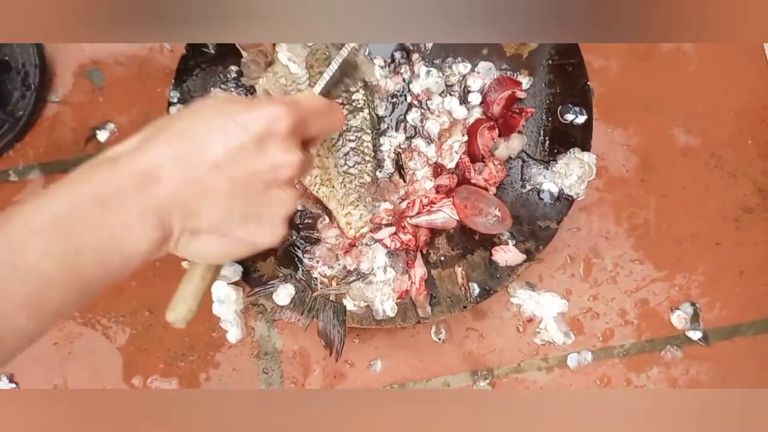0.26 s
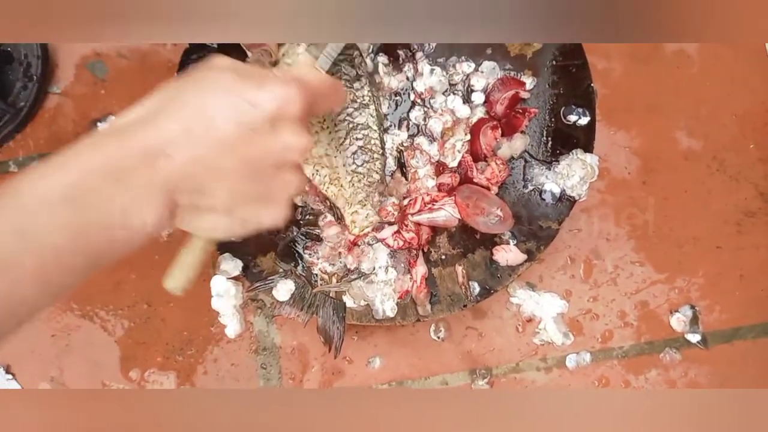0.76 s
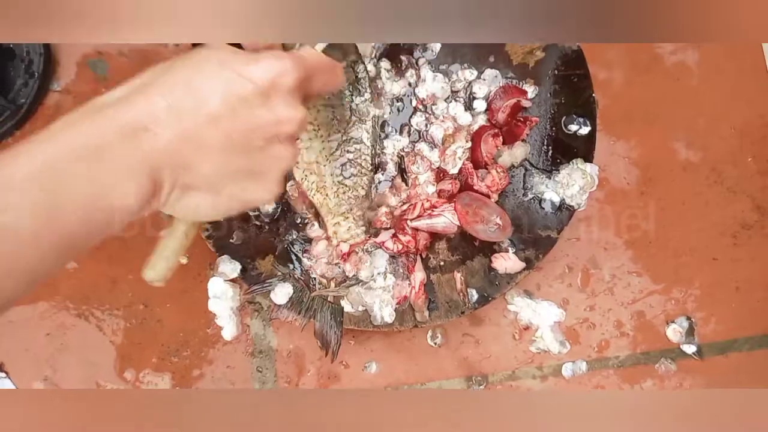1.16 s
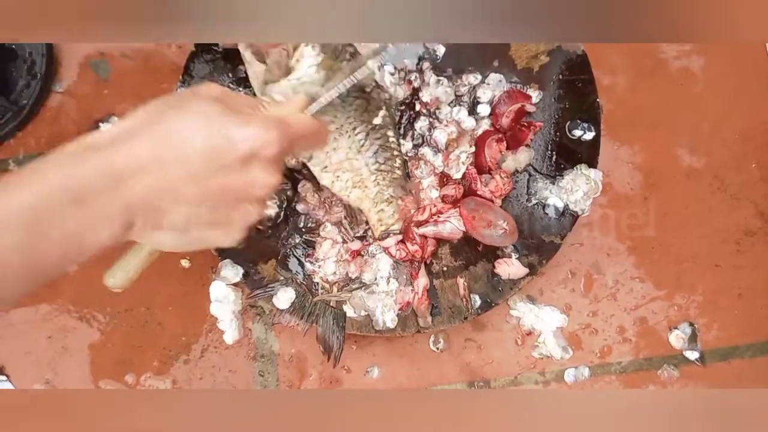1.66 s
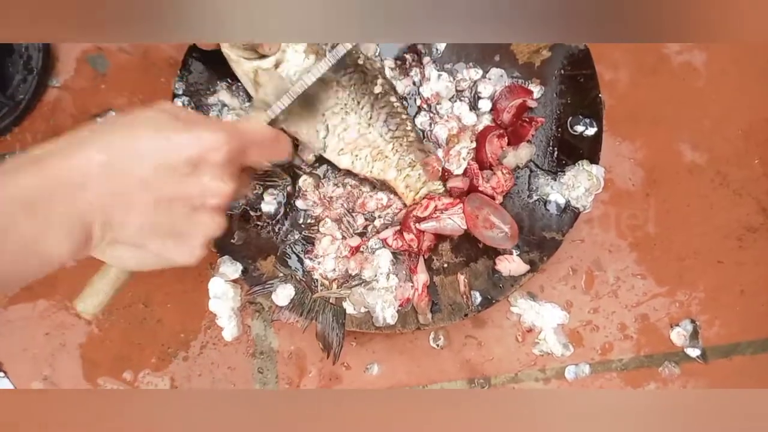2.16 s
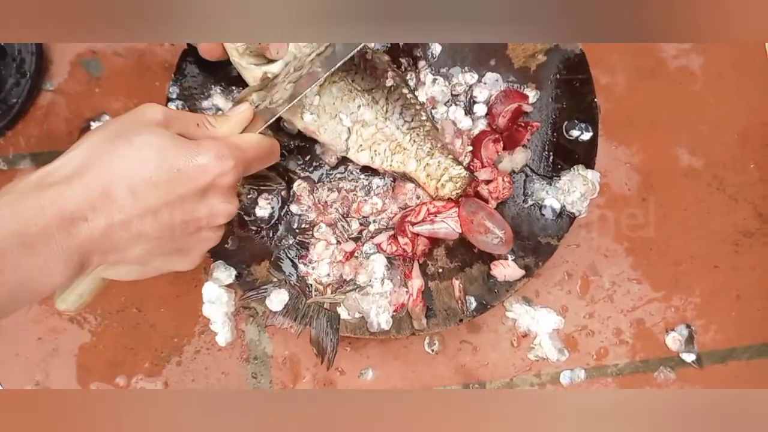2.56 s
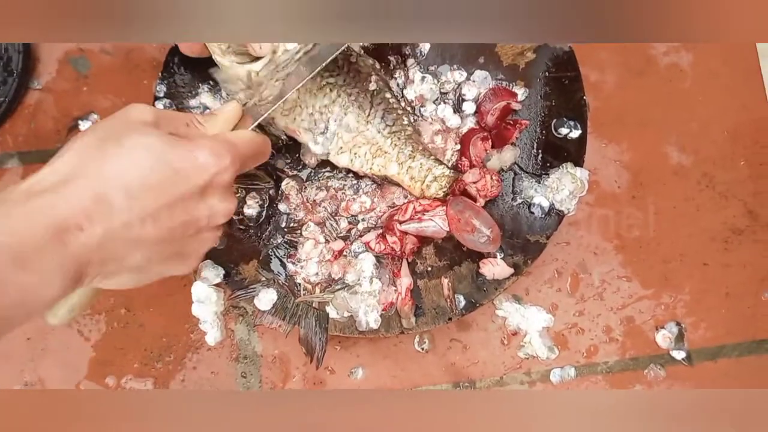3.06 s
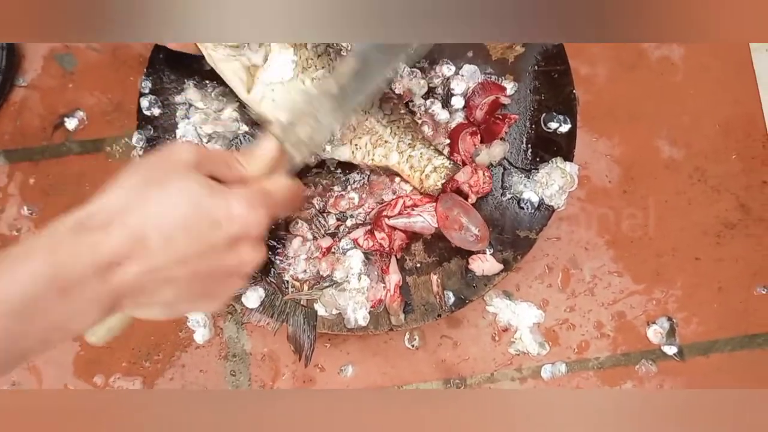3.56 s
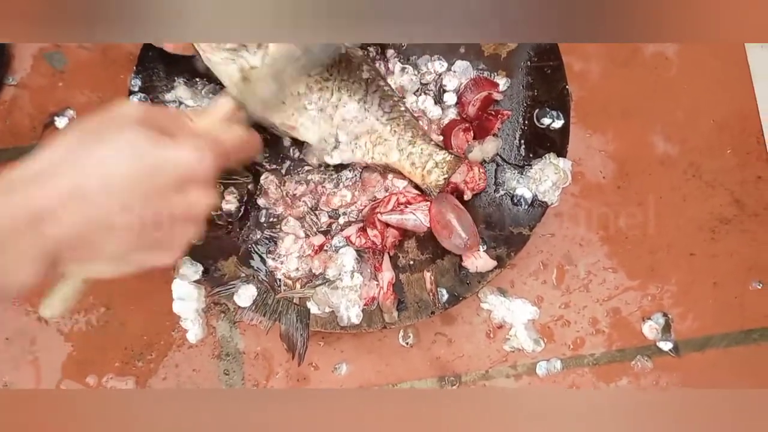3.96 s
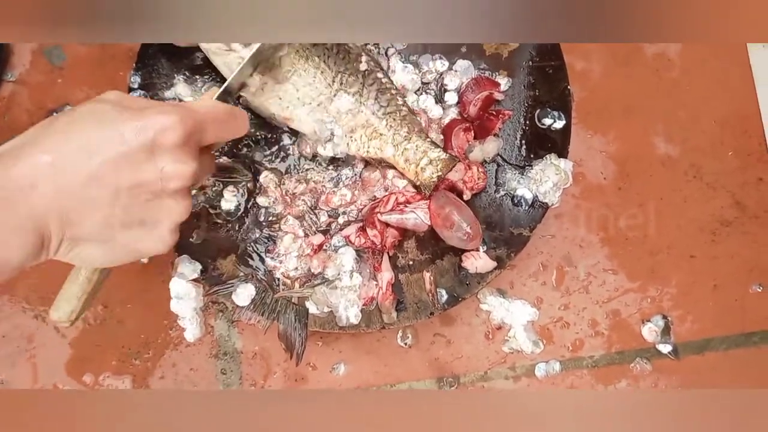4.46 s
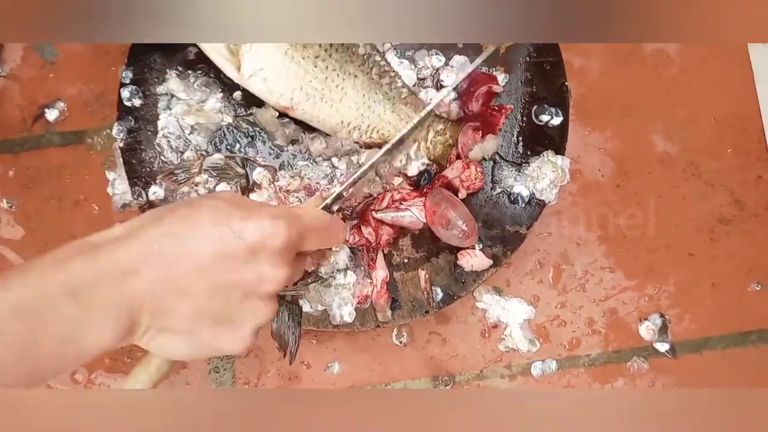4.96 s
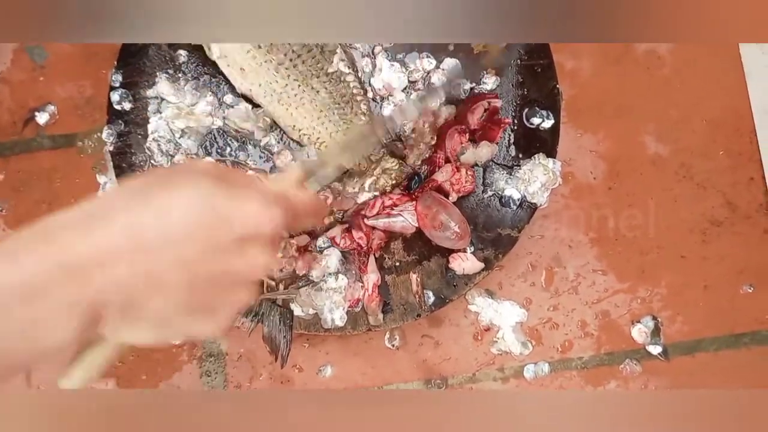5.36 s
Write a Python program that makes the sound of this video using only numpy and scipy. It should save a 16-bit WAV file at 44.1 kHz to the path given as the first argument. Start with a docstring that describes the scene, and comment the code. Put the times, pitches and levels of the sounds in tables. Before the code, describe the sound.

Close up and leaning left, a knife edge scrapes a wet fish on a wooden board. Short gritty rasps bite and release, stiff scales crack off, and slime fizzes brightly. Strokes come quickly at first, then space out, with light wipes between. A small hard room answers briefly over very faint rumble, hiss and hum.

```python
"""Scaling a wet fish

A large knife scrapes a fish on a wooden chopping board, close up and to the left: the edge bites, presses harder,
holds and lets go, while stiff scales snap off and light wipes of the blade fill the gaps.
Uneven bursts of noise ring the scales and the blade, fizz as slime and thud in the board; a narrow rasp zips
upwards, flesh bumps, smacks and slides as soft rings and noise, and wet skin creaks once.
A small hard room answers with decaying noise, over two faint hollow tones, rumble, hiss and an appliance's hum."""
import sys
import numpy as np
from scipy import signal
from scipy.fft import rfft, irfft, next_fast_len
from scipy.io import wavfile
from scipy.ndimage import uniform_filter1d, map_coordinates

SR = 44100
rng = np.random.default_rng(int(sys.argv[2]) if len(sys.argv) > 2 else 0)


def transcribe(signal):
    """Save signal, clipped to [-1, 1], as a 16-bit WAV file at the path in sys.argv[1]."""
    frames = np.atleast_2d(signal).T
    limited = np.clip(frames, -1, 1)
    pcm = np.round(limited * 32767).astype(np.int16)
    wavfile.write(sys.argv[1], SR, pcm)


N = 247401  # samples


def amp(db):
    """Decibels to gain."""
    return 10 ** (np.asarray(db) / 20)


def unit(x):
    """Scale to rms 1."""
    return x / np.sqrt(np.mean(x ** 2) + 1e-20)


def along(points, hz):
    """Read (Hz, value) points on a logarithmic frequency axis."""
    f, value = np.transpose(points)
    return np.interp(np.log(hz + 1), np.log(f), value)


def swell(s, db):
    """Gain per sample through points in seconds and dB, practically silent outside them."""
    return amp(np.interp(np.arange(N) / SR, s, db, left=-140, right=-140))


def wobble(rate):
    """A smooth random curve with rate knots a second."""
    knots = rng.standard_normal(1000)
    return map_coordinates(knots, [np.arange(N) * rate / SR], mode="wrap")


def filtered(x, response):
    """Shape x with a response given as a function of frequency in Hz."""
    size = 2 * next_fast_len(N // 2 + SR // 8)
    spectrum = rfft(x, size) * response(np.fft.rfftfreq(size, 1 / SR))
    return irfft(spectrum, size)[..., :N]


def causal(points, hz):
    """Minimum-phase response of a spectrum in dB, with unit power gain, so that nothing rings early."""
    cepstrum = irfft(np.log(unit(amp(along(points, hz)))))
    half = len(cepstrum) // 2
    return np.exp(rfft(np.r_[cepstrum[0], 2 * cepstrum[1:half], np.zeros(half)]))


def catches(rate, spread_db, life, even_over):
    """Power of random catches: rate a second, uneven in size, decaying over life seconds, local mean 1."""
    sizes = amp(spread_db * rng.standard_normal(N)) ** 2
    hits = (rng.random(N) < rate / SR) * sizes
    power = signal.lfilter([1], [1, -np.exp(-1 / (life * SR))], hits)
    local_mean = np.abs(uniform_filter1d(power, int(even_over * SR) + 1))
    return power / (local_mean + 1e-9)


# How alike the two ports hear the noise. Each row: frequency in Hz, left-right correlation (0 to 1).
PORT_LIKENESS = [(100, 0.65), (500, 0.44), (1500, 0.45), (4000, 0.31), (8000, 0.25), (15000, 0.25)]
LEFT_LEAD = 6  # samples by which the nearer left port hears it first


def burst(power):
    """Tearing noise of the given power at two microphone ports, partly alike and reaching the left first."""
    def mid_side(hz):
        turn = np.arccos(np.clip(along(PORT_LIKENESS, hz), -1, 1)) / 2
        return np.array([np.cos(turn), np.sin(turn)])

    mid, side = filtered(rng.standard_normal((2, N)), mid_side)
    left, right = np.array([mid + side, mid - side]) * np.sqrt(power)
    return np.array([left, np.pad(right, (LEFT_LEAD, 0))[:N]])


def contact(t, attack_s):
    """Gain of a blade that touches down at t = 0 and settles over attack_s seconds."""
    return np.clip(t / attack_s, 0, 1)


# The edge pushed against the scales. Each row: start in seconds, swell in seconds, hold in seconds,
# crackle drive in dB, then relative to it rasp, wet fizz and board thud drive in dB,
# then tilt of the scales' ring and tilt of the blade's ring in dB per octave.
SCRAPE_STROKES = [ (0.0, 0.00067, 0.0089, -31, -11.5, -1.5, -18, 8.5, 3),
                  (0.278, 0.034, 0.0029, -36, -2, -1, -18.5, 5.5, 5),
                  (0.379, 0.0028, 0.0027, -29, -4, -6, -21, 2.5, 15.5),
                  (0.408, 0.0078, 0.0055, -39.5, -7, -0.5, -15, -5, -10.5),
                  (0.531, 0.051, 0.008, -40, -6.5, -1, -17.5, -13, -3.5),
                  (0.641, 0.0044, .018, -45, 0, -2.5, -16.5, -10.5, -4),
                  (0.668, .012, 0.0062, -36, -4, 3, -21.5, -0.5, -2.5),
                  (0.835, 0.0032, 0.022, -40, -8.5, -1, -17, 12.5, 0.5),
                  (0.914, 0.015, 0.0057, -44.5, -3.5, -1.5, -26, 1, 16),
                  (1.027, 0.019, .01, -46.5, -2.5, -4, -20, 16, 6),
                  (1.066, .003, 0.061, -45, -8.5, 3, -19, -6.5, -5.5),
                  (1.369, 0.028, 0.011, -41, -8, 0.5, -23.5, -7.5, -4),
                  (1.459, 0.034, .017, -43.5, -9.5, 1.5, -21.5, -3, -2.5),
                  (1.593, 0.029, 0.02, -47.5, -6, -5, -38, 6, 7.5),
                  (1.754, 0.021, 0.061, -53, -14, 0.5, -20.5, 0, 2),
                  (2.03, 0.074, 0.0091, -41.5, -6.5, 1.5, -20, -4.5, 2.5),
                  (2.684, 0.044, 0.0072, -45.5, -19.5, -5, -46, -5.5, -4.5),
                  (2.84, 0.044, 0.011, -41.5, -8.5, 3, -22, 8, 16),
                  (3.033, 0.019, 0.019, -34.5, -16.5, -4.5, -21, -1.5, -7.5),
                  (3.207, 0.0071, 0.032, -43.5, -12.5, -2, -19.5, 6, 0.5),
                  (3.35, 0.028, 0.0076, -34, -9.5, -0.5, -23.5, 6, 3.5),
                  (3.635, 0.0043, 0.02, -37, -16, 1, -23.5, -4.5, -3.5),
                  (3.878, 0.018, 0.0058, -39.5, -16, 0.5, -22, 6, -3.5),
                  (4.4, 0.026, 0.007, -43.5, -14, -8, -15, 5, -1.5),
                  (4.444, 0.013, 0.04, -52.5, -21, -1, -16, 2.5, -1),
                  (4.75, 0.039, .01, -45.5, -12.5, -3, -13.5, -3, -18),
                  (4.792, 0.0071, 0.095, -54, -5, 0, -20, -3, -13),
                  (5.103, 0.032, 0.11, -46, -5.5, -3, -21.5, -6.5, -12),
                  (5.443, .053, .008, -38.5, -1, -2, -18.5, -4.5, 4.5),
                  (5.511, 0.0055, 0.0077, -39, -11, -2.5, -19.5, -4, -6), ]
BITE_DB, CONTACT_S = -14.5, 0.0033  # a scrape starts this far under full pressure; time to make contact
RELEASE_DB_PER_S = 951.5  # the edge leaves the scales
TRAIL_DB, TRAIL_DB_PER_S = -18.5, 233.5  # loose scales and slime settle behind it
# The blade sliding lightly over slimy skin. Each row: start in seconds, length in seconds,
# crackle drive in dB, wet fizz drive relative to it in dB.
WIPE_STROKES = [(0.099, 0.075, -61.5, 2.5), (0.249, 0.046, -62, 0.5), (0.503, 0.032, -58, 0),
                (0.767, 0.065, -52.5, -2), (0.894, 0.11, -57, -2.5), (1.122, 0.05, -61, 9.5),
                (1.198, 0.083, -63, 2), (1.326, 0.02, -52, 2.5), (1.566, 0.032, -52.5, 3),
                (1.64, 0.19, -63.5, -5), (1.89, 0.076, -74.5, -5), (2.005, .035, -53.5, -1),
                (2.115, 0.028, -52, -7.5), (2.2, 0.15, -81, -10), (2.311, 0.097, -67, -0.5),
                (2.421, 0.12, -71.5, -6), (2.68, .03, -61, -15), (2.817, 0.042, -53.5, -13),
                (2.895, 0.046, -56.5, -3), (2.988, 0.061, -63, 6), (3.131, 0.083, -57.5, 1.5),
                (3.341, .012, -51, -2), (3.444, 0.097, -58.5, -1), (3.593, .02, -61, 0),
                (3.696, 0.072, -58, 0.5), (3.789, 0.094, -66.5, -5.5), (3.862, .02, -59, -3),
                (3.933, .13, -62.5, -0.5), (4.265, 0.059, -57.5, -1), (4.37, .04, -63.5, -1),
                (4.739, 0.021, -57, -13), (5.05, .05, -65.5, -7), (5.383, 0.063, -63.5, -10.5)]
WIPE_RASP_DB, WIPE_THUD_DB = -16.5, -22  # relative to the crackle: a light touch hardly drives blade or board
WIPE_ATTACK_S, WIPE_RELEASE_DB_PER_S = .008, 448.5  # the flat of the blade settles softly and lifts off


def stroke_powers():
    """Drive power of crackle, rasp, fizz and thud: scrapes swell, hold and let go; wipes touch evenly."""
    power = np.zeros((4, N + SR))
    t = np.arange(SR // 2) / SR
    strokes = []
    for start, swell_s, hold_s, db, rasp_db, fizz_db, thud_db, *_ in SCRAPE_STROKES:
        after = np.maximum(t - swell_s - hold_s, 0)
        pressure = contact(t, CONTACT_S) * amp(BITE_DB * np.maximum(1 - t / swell_s, 0))
        leaving = amp(-RELEASE_DB_PER_S * after)
        trail = amp(TRAIL_DB - TRAIL_DB_PER_S * after)
        layers_db = db + np.array([0, rasp_db, fizz_db, thud_db])
        strokes.append((start, pressure * np.maximum(leaving, trail), layers_db))
    for start, length, db, fizz_db in WIPE_STROKES:
        lift = amp(-WIPE_RELEASE_DB_PER_S * np.maximum(t - length, 0))
        layers_db = db + np.array([0, WIPE_RASP_DB, fizz_db, WIPE_THUD_DB])
        strokes.append((start, contact(t, WIPE_ATTACK_S) * lift, layers_db))
    for start, shape, layers_db in strokes:
        first = round(start * SR)
        power[:, first:first + len(t)] += np.outer(amp(layers_db), shape) ** 2
    return power[:, :N]


def ring_tilts():
    """Each scrape meets other scales with another part of the edge, so both ring tilts glide between scrapes."""
    start, swell_s, *_, scales_db, blade_db = np.transpose(SCRAPE_STROKES)
    t = np.arange(N) / SR
    return [np.interp(t, start + swell_s, tilt) for tilt in (scales_db, blade_db)]


# The stiffest scales snapping off. Each row: time in seconds, snap drive in dB before each layer's trim,
# then relative to it rasp drive and wet fizz drive in dB, then offset to the left in dB.
SCALE_SNAPS = [(0.0034, -19, -25, -31, -11), (0.0968, -30, -16, -14.5, -0.5),
               (0.1384, -36.5, -23, -11.5, 0), (0.161, -36.5, -39, -11, -2), (0.3098, -25, -28, -23, -9),
               (0.3801, -15, -14, -22.5, 3.5), (0.3834, -20, -18, -18.5, -14),
               (0.4133, -27.5, -34, -7.5, -3), (0.5553, -25, -26, -12, 1), (0.5656, -20.5, -23, -11, 0),
               (0.5806, -19.5, -16.5, -10.5, -3), (0.6438, -25.5, -28, -30, 14.5),
               (0.6538, -23.5, -13, -20, -7), (0.6804, -12.5, -19.5, -14.5, 0),
               (0.834, -20.5, -24.5, -25, 6.5), (0.859, -20.5, -17.5, -20, -7), (0.93, -23, -23, -12.5, -3),
               (0.9623, -52, -26, -12, -6), (0.9884, -29, -23, -15.5, -8.5), (1.0672, -10, -17, -22, 0.5),
               (1.119, -27.5, -14, -7, -10), (1.153, -40, -22, -4, -5), (1.284, -36, -26, -20, 2),
               (1.3276, -31, -46, -29, 3.5), (1.3983, -22, -17, -12, -5), (1.606, -24, -42, -21, 2),
               (1.6273, -25.5, -12.5, -11.5, 1.5), (1.6501, -22, -38, -15.5, -1),
               (1.698, -33.5, -24, -24, 3.5), (1.8046, -27.5, -38, -11.5, -4), (1.8297, -25, -21, -15, -4),
               (2.07, -32, -20, -10, -4), (2.0891, -23.5, -17, -6.5, -6), (2.376, -35, -33, -16, 0),
               (2.3977, -41.5, -14, -7, 2.5), (2.843, -26, -32, -20, 3), (2.8823, -17, -18, -25, 2.5),
               (2.89, -18, -21, -21, 2), (2.907, -24, -22, -11, -2.5), (3.041, -22, -25, -16, 3.5),
               (3.2033, -23, -18, -20, 0), (3.211, -21, -20, -16, 3.5), (3.237, -17, -23, -19.5, 0.5),
               (3.258, -27, -28, -9.5, 1.5), (3.3784, -22.5, -12.5, -22, 3.5),
               (3.387, -15, -20.5, -18.5, 0.5), (3.473, -33.5, -25.5, -19, 8), (3.518, -39, -34.5, -6, 3),
               (3.617, -21.5, -22, -17.5, 8), (3.6396, -6, -17.5, -20.5, 1), (3.661, -16, -30, -25.5, -5),
               (3.7456, -39.5, -39, -24.5, 10), (3.8846, -30.5, -16.5, -10, 6.5),
               (3.897, -26.5, -33, -21, 8), (4.2802, -27.5, -43, -25, -7), (4.4115, -34.5, -28, -20, 8),
               (4.474, -36.5, -18.5, -7, -5), (4.702, -39.5, -31, -25, 3), (5.0608, -33, -20, -17.5, -2),
               (5.219, -31.5, -38, -5.5, 1), (5.24, -28, -36, -8.5, 3.5), (5.4425, -36.5, -17, -7, 8),
               (5.4632, -20, -17, -10.5, 4), (5.4769, -11, -19, -9.5, 3), (5.4989, -14, -7, -20, -2.5),
               (5.527, -20.5, -22, -11.5, 0)]
SNAP_THUD_DB = -40.5  # the board's drive relative to the snap


def snap_powers(rise, life, flutter_db, flutter_life, crackle_db):
    """The same four powers per port for single scales: a sharp crack, then a flutter as the scale flies off."""
    t = np.arange(SR // 16) / SR
    crack = np.exp(-t / life)
    flutter = amp(flutter_db) ** 2 * np.exp(-t / flutter_life)
    shape = (1 - np.exp(-t / rise)) ** 2 * (crack + flutter)
    power = np.zeros((4, 2, N + SR))
    for s, db, rasp_db, fizz_db, pan_db in SCALE_SNAPS:
        sizes = amp(db + np.array([crackle_db, rasp_db, fizz_db, SNAP_THUD_DB]))
        sides = amp(pan_db * np.array([.5, -.5]))
        first = round(s * SR)
        power[:, :, first:first + len(t)] += np.outer(sizes, sides)[:, :, None] ** 2 * shape
    return power[:, :, :N]


def ringing(x, modes, low_hz, high_hz, shift_db, tilt_db):
    """Resonances trading power as the contact point moves; tilt_db per octave favours the upper ones."""
    t = np.arange(SR // 50) / SR
    rings = []
    for k, (hz, width, db) in enumerate(modes):
        decay = np.sqrt(width) * np.exp(-np.pi * width * t)
        rings.append(amp(db) * decay * np.cos(2 * np.pi * hz * t) * (-1) ** k)  # neighbours alternate in sign
    band = signal.butter(4, [low_hz, high_hz], "band", fs=SR, output="sos")
    rings = signal.sosfilt(band, np.array(rings))
    shares = np.array([amp(shift_db * wobble(18) + tilt_db * np.log2(hz / low_hz)) for hz, _, _ in modes])
    shares /= np.sqrt(np.sum(shares * (rings @ rings.T @ shares), axis=0))  # total power gain stays the same
    return sum(share * signal.oaconvolve(x, ring[None], axes=1)[:, :N] for share, ring in zip(shares, rings))


# Broad resonances of the blade pressed into the fish.
# Each row: frequency in Hz, width in Hz, level in dB before band limiting and power sharing.
BLADE_MODES = [(1350, 990, -3.5), (1644, 277, 0.5), (1869, 190, -6.5), (2324, 230, -3), (2578, 300, 0),
               (3230, 560, -3)]
# Broad resonances of the scales, with the same columns: frequency in Hz, width in Hz, level in dB.
SCALE_MODES = [(3590, 870, -7.5), (4086, 1530, 2), (4774, 1500, 1), (5200, 1440, -1.5), (6223, 440, -1.5),
               (6650, 570, -8)]
# Spectrum of the fizzing slime. Each row: frequency in Hz, relative level in dB per Hz.
FIZZ_COLOUR = [(4000, -41.5), (6800, -8.5), (7700, -10), (8800, -3.5), (10200, -2.5), (11400, 0.5),
               (12250, 1), (13000, -0.5), (14500, -1), (15700, -6.5)]
# Spectrum of the thudding board. Each row: frequency in Hz, relative level in dB per Hz.
BOARD_COLOUR = [(40, -29), (90, 6.5), (200, -9.5), (290, -4), (390, -1), (600, -6.5), (800, -3.5),
                (1050, -5.5), (1600, -23.5), (4000, -61)]


def scraping():
    """Catches under the edge and snapping scales jointly excite scales, blade, slime and board."""
    drag = stroke_powers()
    snap = snap_powers(rise=0.00059, life=0.0013, flutter_db=-20.5, flutter_life=0.0063, crackle_db=-8)
    scales_tilt, blade_tilt = ring_tilts()
    grain = catches(rate=450, spread_db=5.5, life=0.00048, even_over=0.036) + amp(-3.0) ** 2
    spit = catches(rate=2800, spread_db=7.5, life=.0004, even_over=0.019)  # slime breaks up finer than scales
    wet_pops = catches(rate=70, spread_db=5.5, life=0.00011, even_over=0.51)  # stand out of the rasp
    flicks = catches(rate=63, spread_db=2.5, life=0.0016, even_over=.2)  # small scales flicking off
    pops = wet_pops * amp(-8.0) ** 2 + flicks * amp(-15) ** 2

    crackle = burst(drag[0] * (grain + pops) * amp(-3.5) ** 2 + snap[0])
    rasp = burst(drag[1] * (grain + pops) * amp(-4.0) ** 2 + snap[1] * amp(-0.5) ** 2)
    fizz = burst(drag[2] * (grain + spit + pops) * amp(-4.5) ** 2 + snap[2] * amp(6.5) ** 2)
    thud = burst(drag[3] * grain * amp(-1.5) ** 2 + snap[3])

    scales = ringing(crackle, SCALE_MODES, low_hz=2700, high_hz=7380, shift_db=2.5, tilt_db=scales_tilt)
    blade = ringing(rasp, BLADE_MODES, low_hz=990, high_hz=3330, shift_db=4.0, tilt_db=blade_tilt)
    slime = filtered(fizz, lambda hz: causal(FIZZ_COLOUR, hz))
    board = filtered(thud, lambda hz: causal(BOARD_COLOUR, hz))
    return scales + blade + slime + board


# The edge zipping along a row of scales. Each row: time in seconds, centre pitch in Hz, level in dB.
ZIP_PATH = [(2.03, 2790, -58), (2.046, 3047, -49), (2.058, 3300, -44.5), (2.076, 3800, -41.5),
            (2.103, 4210, -37.5), (2.124, 4490, -68), (2.17, 4430, -64)]


def zipping(width_hz):
    """Low-passed noise rides on a gliding tone: a narrow rasp that climbs as the edge gathers speed."""
    s, hz, db = np.transpose(ZIP_PATH)
    phase = 2 * np.pi * np.cumsum(np.interp(np.arange(N) / SR, s, hz)) / SR
    teeth = burst(catches(rate=350, spread_db=2, life=0.00094, even_over=0.04))
    narrow = unit(filtered(teeth, lambda f: 1 / (1 + 1j * f / width_hz) ** 3))
    return swell(s, db) * narrow * np.cos(phase)


def blips(table, rise, life, wander):
    """Damped rings of something soft, whose pitch wanders as it gives way."""
    out = np.zeros(N + SR)
    t = np.arange(SR // 6) / SR
    for s, hz, db in table:
        phase = 2 * np.pi * np.cumsum(hz * (1 + wander * wobble(120)[:len(t)])) / SR
        envelope = (1 - np.exp(-t / rise)) * np.exp(-t / life)
        first = round(s * SR)
        out[first:first + len(t)] += amp(db) * np.sin(phase) * envelope
    return out[:N]


# The fish bumping on the board under harder strokes.
# Each row: start in seconds, mean pitch in Hz, level in dB before the envelope.
FISH_BUMPS = [(0.002, 374, -48.5), (0.313, 129, -51), (0.386, 115, -48), (0.389, 376, -65),
              (1.07, 391, -47), (3.048, 313.4, -48.5), (3.056, 407, -67), (3.385, 396, -58)]
# Small smacks as slime lets go. Each row: start in seconds, mean pitch in Hz, level in dB before the envelope.
SLIME_SMACKS = [(1.698, 3000, -36.5), (2.445, 2520, -52.5), (3.939, 3290, -42), (5.269, 3930, -34.5)]
# The fish sliding a little on the wet board. Each row: time in seconds, drive level in dB.
SLIDE_PATH = [(4.34, -100), (4.37, -66), (4.4, -70), (4.42, -57.5), (4.46, -59.5), (4.5, -80), (4.54, -83)]
# Spectrum of that slide. Each row: frequency in Hz, relative level in dB per Hz.
SLIDE_SPECTRUM = [(200, -31), (330, -20), (430, 2), (600, -1), (780, 0), (1020, -6.5), (1400, -12),
                  (3000, -58.5)]


def flesh():
    """The body bumps and its slime smacks as damped rings; gripping noise slides it along the board."""
    bumps = blips(FISH_BUMPS, rise=0.0037, life=0.019, wander=.12)
    smacks = blips(SLIME_SMACKS, rise=0.00037, life=0.0013, wander=0.056)
    grip = catches(rate=890, spread_db=2.5, life=0.00039, even_over=.03)
    drag = burst(grip * swell(*np.transpose(SLIDE_PATH)) ** 2)
    slide = filtered(drag, lambda hz: causal(SLIDE_SPECTRUM, hz))
    return bumps + smacks + slide


# The wet rub. Each row: time in seconds, drive level in dB.
CREAK_PATH = [(4.596, -110), (4.604, -56), (4.609, -50), (4.653, -51.5), (4.7, -71.5)]
# Spectrum of the creak. Each row: frequency in Hz, relative level in dB per Hz.
CREAK_SPECTRUM = [(200, -43.5), (550, -16.5), (900, -8), (1350, -10.5), (1750, -17), (2650, 3.5),
                  (3200, -7.5), (3850, -3.5), (4300, -20), (5950, -16.5), (7600, -40), (11000, -30),
                  (12600, -16), (15000, -41)]


def creak():
    """Wet skin sticks and slips in a quick uneven run."""
    slips = catches(rate=700, spread_db=8.5, life=.0005, even_over=0.024) + amp(-6) ** 2
    rub = burst(slips * swell(*np.transpose(CREAK_PATH)) ** 2)
    return filtered(rub, lambda hz: causal(CREAK_SPECTRUM, hz))


# How fast the room's tail dies. Each row: frequency in Hz, time to fall by 60 dB in seconds.
ROOM_DECAY = [(200, 0.17), (1400, 0.26), (4500, 0.21), (9000, 0.096), (15000, 0.19)]


def room(x, early_db, early_life, tail_db):
    """Board and floor tiles answer first; the walls add a short tail, its decay depending on frequency."""
    hz, s, z = signal.stft(rng.standard_normal((2, SR // 2)), SR, nperseg=256)
    fading = z * amp(-60 * s / along(ROOM_DECAY, hz)[:, None])
    tail = signal.istft(fading, SR, nperseg=256)[1]
    t = np.arange(tail.shape[1]) / SR
    early = rng.standard_normal(tail.shape) * np.exp(-t / early_life) * (t > .002)
    tail = tail * (t > .008)
    answer = amp(early_db) * early / np.linalg.norm(early[0]) + amp(tail_db) * tail / np.linalg.norm(tail[0])
    return signal.fftconvolve(x, answer, axes=1)[:, :N]


# Balance of the work between the ports. Each row: frequency in Hz, left over right in dB.
LEFT_BALANCE = [(100, 0.5), (700, -1), (1300, 3.5), (2400, 8), (4100, 11.5), (6100, 8), (7300, -1),
                (10000, 1), (12000, 2), (15000, -0.5)]


def placed_left(x):
    """Tilt the balance by frequency: the upper mids lean strongly to the left."""
    return filtered(x, lambda hz: amp(np.outer([.5, -.5], along(LEFT_BALANCE, hz))))


# Faint hollow tones. Each row: start in seconds, end in seconds, mean pitch in Hz, rms level in dB.
HOLLOW_TONES = [(4.358, 4.572, 500, -71.5), (4.874, 4.975, 574, -82)]


def hoots():
    """Two faint sine tones that swell and fade while their pitch wavers slightly."""
    t = np.arange(N) / SR
    out = np.zeros(N)
    for start, end, hz, db in HOLLOW_TONES:
        arch = np.sin(np.pi * np.clip((t - start) / (end - start), 0, 1))
        phase = 2 * np.pi * np.cumsum(hz * (1 + 0.0219 * wobble(70))) / SR
        out += amp(db) * 2 * arch * np.sin(phase)
    return out


# Hum of an appliance. Each row: frequency in Hz, rms level in dB around which it drifts.
HUM_TONES = [(100.5, -78), (200.8, -77)]
# Spectrum of the low rumble. Each row: frequency in Hz, relative level in dB per Hz.
RUMBLE_COLOUR = [(20, -28.5), (35, -17), (55, 0), (75, 1.5), (110, -3.5), (150, -12), (230, -14.5),
                 (400, -20.5), (800, -26.5), (2000, -41.5)]
# Spectrum of the soft hiss. Each row: frequency in Hz, relative level in dB per Hz.
HISS_COLOUR = [(300, -20), (900, -6), (1700, -4), (3000, -8.5), (4300, -5), (6100, 4), (7500, -13.5),
               (10000, -11.5), (15000, -6)]


def background():
    """Rumble and hiss of the house as shaped noise, and an appliance's hum as gently drifting sines."""
    t = np.arange(N) / SR
    hum = np.zeros(N)
    for hz, db in HUM_TONES:
        level = amp(db + 0.93 * wobble(1.8)) * np.sqrt(2)
        hum += level * np.sin(2 * np.pi * hz * t + .15 * wobble(5.6))
    rumble = amp(-70.5) * unit(filtered(burst(1), lambda hz: amp(along(RUMBLE_COLOUR, hz))))
    hiss = amp(-77.5 + wobble(16)) * unit(filtered(burst(1), lambda hz: amp(along(HISS_COLOUR, hz))))
    return hum + rumble + hiss


def scene():
    """The work on the board in its room, leaning left, over the hollow tones and the background."""
    work = scraping() + zipping(width_hz=700) + flesh() + creak()
    work = work + room(work, early_db=-7.0, early_life=0.0023, tail_db=-17.5)
    return placed_left(work) + hoots() + background()


TOP_HZ = 15850  # upper band limit


def record(dry):
    """The recorder cuts steeply above its band limit."""
    return filtered(dry, lambda hz: 1 / np.sqrt(1 + (hz / TOP_HZ) ** 240))


dry = scene()
out = record(dry)
transcribe(out)
```